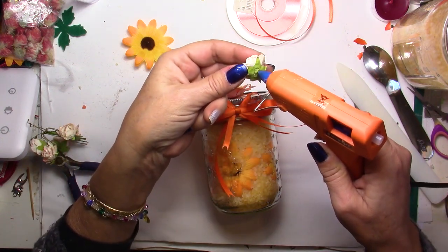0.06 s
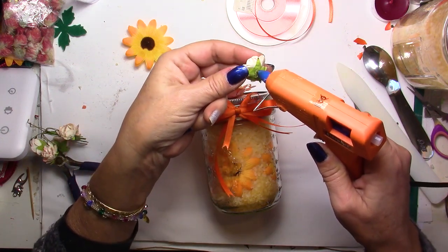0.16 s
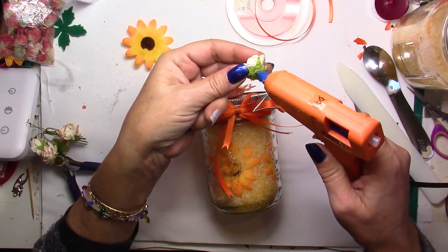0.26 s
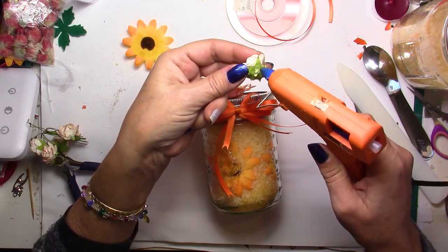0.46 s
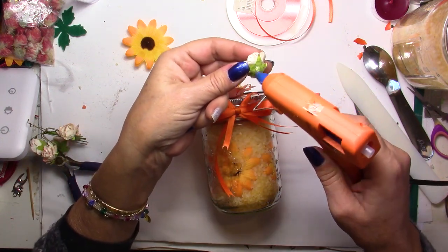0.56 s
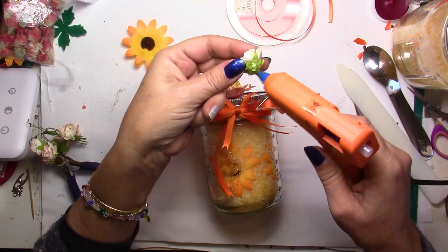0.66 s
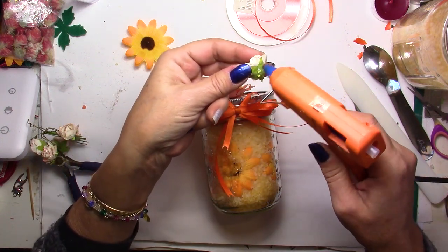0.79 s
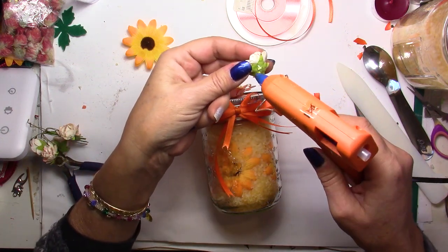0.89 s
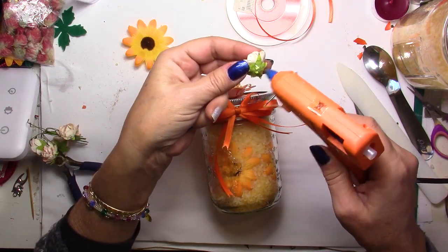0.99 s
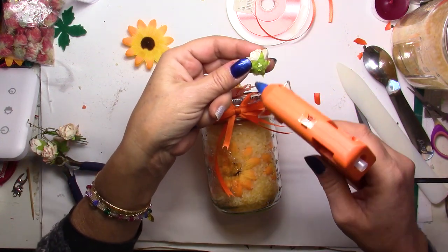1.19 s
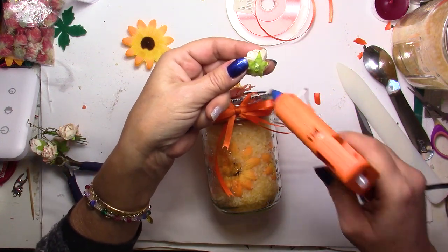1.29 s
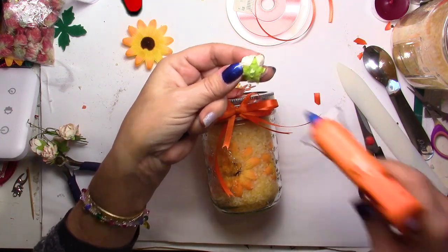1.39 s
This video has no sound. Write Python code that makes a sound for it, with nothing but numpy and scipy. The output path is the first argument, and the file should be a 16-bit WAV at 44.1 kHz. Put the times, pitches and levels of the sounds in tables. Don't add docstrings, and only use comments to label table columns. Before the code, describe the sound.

A plastic glue gun trigger ticks three times, then creaks in a rapid ratcheting burst.

```python
import sys
import numpy as np
from scipy import signal
from scipy.io import wavfile
from scipy.ndimage import uniform_filter1d, map_coordinates

SR = 44100
rng = np.random.default_rng(int(sys.argv[2]) if len(sys.argv) > 2 else 0)


def wav_record(signal):
    frames = np.transpose(np.atleast_2d(signal))
    bounded = np.clip(frames, -1, 1)
    quanta = np.round(bounded * 32767).astype(np.int16)
    wavfile.write(sys.argv[1], SR, quanta)


def volts_from_db(level):
    exponent = np.asarray(level, float) / 20
    return 10 ** exponent


N = 63945

TICK_TIMES = [.2043, .2688, .3068]
TICK_LEVELS = [-22.5, -21, -30]
SLIP_TIMES = [.3614, .3699, .3783, .3866, .3937, .4005, .4077, .4156, .4241, .4336, .4446, .4533, .4605,
              .4687, .4759, .4831, .4942, .5054, .5167, .521, .5254, .5322]
SLIP_LEVELS = [-23, -24, -25, -26.5, -26.5, -25.5, -25, -25, -24, -24, -22, -24.5, -24, -25.5, -25.5, -27.5,
               -27, -26.5, -26, -26, -27, -26.5]
# (frequency [Hz], level [dB])
LEVER_MODES = [(1010, -23.5), (1750, -21.5), (3100, -25.5), (3800, -31), (4150, 4), (4520, -1.5),
               (6400, -32), (7150, 9), (8400, 4), (9400, 7), (10700, 2), (13200, -18.5), (15300, -11)]
# (frequency [Hz], level at start [dB], level at middle [dB], level at end of squeeze [dB])
SHELL_MODES = [(1055, -24, -6.5, -37), (1554, -10, -6, -11.5), (1833, -11.5, -4.5, -9),
               (2482, -8, -4, -4.5), (3240, -6, 4.5, -15.5), (3720, 0, -15, -5.5), (4390, 3.5, 2, 6),
               (5105, 1, 8.5, 4), (5900, 1.5, 2, 0), (6470, -4, 5, -3), (8140, -25, 4, 2),
               (9540, 4.5, -4.5, -11), (10570, -1, -21, -22), (13600, -3, -24, -36)]
SQUEEZE_TIMES = (0.4, .43, 0.45)
# (time [s], energy level [dB], frequency [Hz])
SINGLE_KNOCKS = [
    (0.5184, -29, 1520),
    (.5535, -42, 5500),
    (.5535, -36, 6300),
    (0.5518, -53, 2860),
    (.329, -56, 614),
    (1.311, -62, 9600),
    (1.311, -64, 7450),
    (1.3115, -66, 4500),
    (1.312, -65, 2300),
]
# (time [s], rise time [s])
CONTACT_RISE = [(.31, .00016), (.36, .00004), (.43, .00007), (.49, .00011)]
# (delay [s], level [dB])
REPEATS = [
    (0, -11),
    (.0004, 0),
    (.0015, -6),
    (.0022, -11),
    (.0033, -15),
    (.0046, -18),
]
# (frequency [Hz], reverberation time T60 [s])
ROOM_DECAY = [(500, 0.15), (2000, 0.22), (6000, 0.12), (12000, 0.097)]
# (time [s], level [dB])
CRICKET_CHIRPS = [(-.02, -79), (.11, -79), (.645, -78.5), (.845, -75.5), (.975, -76.5), (1.17, -79.5),
                  (1.305, -76.5)]
# (time [s], level [dB])
HAND_LEVEL = [(.95, -96), (1.04, -67), (1.12, -86), (1.22, -86), (1.27, -73), (1.31, -63), (1.35, -68),
              (1.45, -68)]
# (frequency [Hz], density [dB per Hz])
RIBBON_COLOUR = [(200, -15), (500, 3), (1500, -4.5), (5000, -16), (12000, -17.5)]
# (frequency [Hz], density [dB per Hz])
AIR_COLOUR = [(30, -26), (122, -6), (480, -2), (1300, -10), (5500, -19), (13000, -30), (15000, -28),
              (15800, -23)]
# (frequency [Hz], likeness [0-1])
LIKENESS = [(60, 0.14), (180, 0.9), (550, 0.26), (1650, 0.72), (4970, 0.82), (15000, 0.87)]

RING_CYCLES, PARTS = 46, 4
SPREAD, DETUNE = .04, .006
SHIFT_S, SCATTER_DB = .00003, 1
LEVER_DB, SHELL_DB, LEVER_ROOM_DB = -11, -9, -1
LOW_HZ, TOP_HZ = 850, 15800
PAN_DB, ASIDE_S, ASIDE_DB = .2, .00011, -20.5
WALL_S, EARLY_DB, ROOM_DB, ROOM_SIDE_DB = .0155, -6.5, -10, -19.5
CHIRP_HZ, CHIRP_S, EDGE_S = 5561, .07, .012
WHINE_HZ, WHINE_DB = 15735, -78
AIR_DB, AIR_TOP_HZ = -59.5, 15850


def gun():
    track = np.zeros(N + SR)
    lever_hz, lever_db = np.transpose(LEVER_MODES)
    for s, db in zip(TICK_TIMES, TICK_LEVELS):
        add_jerk(track, s, db + LEVER_DB, lever_hz, lever_db)
    shell_hz, *stages = np.transpose(SHELL_MODES)
    for s, db in zip(SLIP_TIMES, SLIP_LEVELS):
        shell_db = [np.interp(s, SQUEEZE_TIMES, mode) for mode in np.transpose(stages)]
        add_jerk(track, s, db + SHELL_DB, shell_hz, shell_db)
    for s, db, hz in SINGLE_KNOCKS:
        add_jerk(track, s, db + SHELL_DB, [hz], [0])
    band = signal.butter(6, [LOW_HZ, TOP_HZ], "band", fs=SR, output="sos")
    return signal.sosfilt(band, track[:N])


def add_jerk(track, s, db, mode_hz, mode_db):
    t = np.arange(SR // 16)[:, None, None] / SR
    level_luck, tuning_luck = rng.standard_normal((2, len(mode_hz), PARTS))
    delay_luck = rng.standard_normal(len(REPEATS))
    hz = np.asarray(mode_hz)[:, None]

    family = np.linspace(-1, 1, PARTS) * np.sqrt(2)
    partial_hz = hz * (1 + SPREAD * family + DETUNE * tuning_luck)
    fall_db = np.asarray(mode_db)[:, None] + SCATTER_DB * level_luck - 60 * t * hz / RING_CYCLES
    partials = volts_from_db(fall_db) * np.sin(2 * np.pi * partial_hz * t)
    rise_s = np.interp(s, *np.transpose(CONTACT_RISE))
    ring = (partials * (1 - np.exp(-t / rise_s)) ** 2).sum(axis=(1, 2))

    jerk = np.zeros(len(t))
    for (late, loss_db), luck in zip(REPEATS, delay_luck):
        delay = round(abs(late + SHIFT_S * luck) * SR)
        jerk += volts_from_db(loss_db) * np.pad(ring, (delay, 0))[:len(t)]
    track[round(s * SR):][:len(t)] += volts_from_db(db) * jerk / np.linalg.norm(jerk) * 10


def side_bounce(gun_sound):
    return volts_from_db(ASIDE_DB) * np.roll(gun_sound, round(ASIDE_S * SR)) * np.array([[1], [-1]])


def room(x):
    hz, t, z = signal.stft(rng.standard_normal((2, SR // 2)), SR, nperseg=128)
    early = np.where(t < WALL_S, volts_from_db(EARLY_DB), 1)
    decay = volts_from_db(-60 * t / along(ROOM_DECAY, hz)[:, None])
    tail = signal.istft(z * early * decay, SR, nperseg=128)[1]
    tail = tail / np.linalg.norm(tail[0])
    delayed = np.pad(x, (90, 0))[None]
    mid, side = signal.fftconvolve(delayed, tail, axes=1)[:, :N]
    return mid + volts_from_db(ROOM_SIDE_DB) * np.array([side, -side])


def along(points, hz):
    f, v = np.transpose(points)
    return np.interp(np.log(hz + 1), np.log(f + 1), v)


def cricket():
    t = np.arange(N) / SR
    gate = np.zeros(N)
    for s, db in CRICKET_CHIRPS:
        to_edge = np.minimum(t - s, s + CHIRP_S - t)
        gate += volts_from_db(db) * np.clip(to_edge / EDGE_S, 0, 1)
    return np.sqrt(2) * gate * np.sin(2 * np.pi * CHIRP_HZ * t + 0.38 * wobble(31.6))


def screen():
    t = np.arange(N) / SR
    return np.sqrt(2) * volts_from_db(WHINE_DB + .4 * wobble(12)) * np.sin(2 * np.pi * WHINE_HZ * t)


def wobble(rate):
    knots = rng.standard_normal(int(N * rate / SR) + 4)
    return map_coordinates(knots, [np.arange(N) * rate / SR])


def hand():
    s, db = np.transpose(HAND_LEVEL)
    hand_db = np.interp(np.arange(N) / SR, s, db) + 3 * wobble(60.83)
    return volts_from_db(hand_db) * rush(RIBBON_COLOUR, patchy_db=-2)


def air():
    return volts_from_db(AIR_DB + .5 * wobble(6.55)) * rush(AIR_COLOUR, patchy_db=0.73)


def rush(spectrum, patchy_db):
    hz, _, z = signal.stft(rng.standard_normal((2, N + SR // 8)), SR, nperseg=2048)
    patches = uniform_filter1d(rng.standard_normal(z.shape[1:]), size=16, axis=0)
    patches = uniform_filter1d(patches, size=3, axis=1)
    z = z * volts_from_db(patchy_db * unit(patches) + along(spectrum, hz)[:, None])
    z = z * (hz < AIR_TOP_HZ)[:, None]
    turn = np.arccos(np.clip(along(LIKENESS, hz), -1, 1)) / 2
    z = z * np.array([np.cos(turn), np.sin(turn)])[..., None]
    mid, side = signal.istft(z, nperseg=2048)[1][:, 2048:N + 2048]
    return unit(np.array([mid + side, mid - side]))


def unit(x):
    return x / np.sqrt(np.mean(x ** 2) + 1e-20)


def scene():
    gun_sound = gun()
    direct = gun_sound * volts_from_db(np.array([[PAN_DB], [-PAN_DB]]))
    before_slips = np.arange(N) < (SLIP_TIMES[0] - .01) * SR
    send = gun_sound * np.where(before_slips, volts_from_db(LEVER_ROOM_DB), 1)
    near = direct + side_bounce(gun_sound) + volts_from_db(ROOM_DB) * room(send)
    return near + cricket() + screen() + hand() + air()


def low_pass(x):
    return signal.sosfilt(signal.butter(12, 16850, fs=SR, output="sos"), x)


def record(dry):
    return low_pass(dry)


dry = scene()
out = record(dry)
wav_record(out)
```